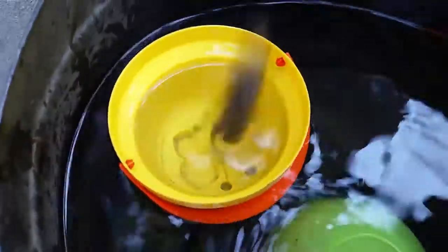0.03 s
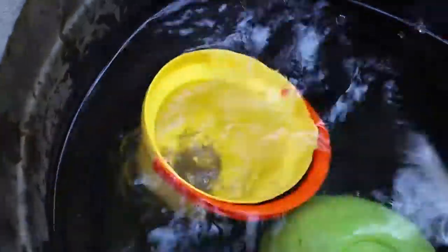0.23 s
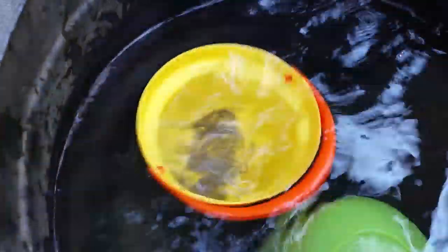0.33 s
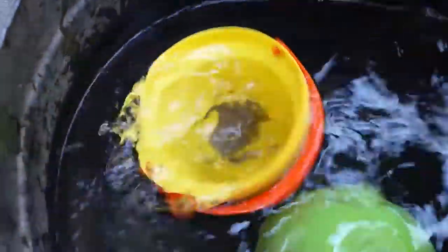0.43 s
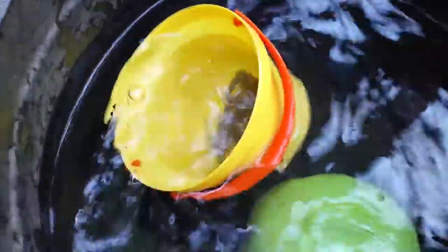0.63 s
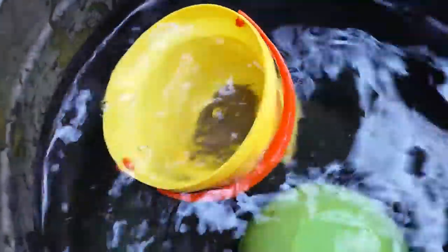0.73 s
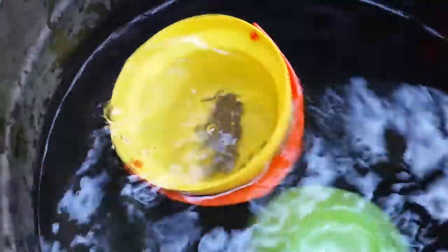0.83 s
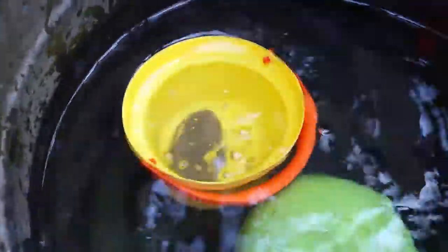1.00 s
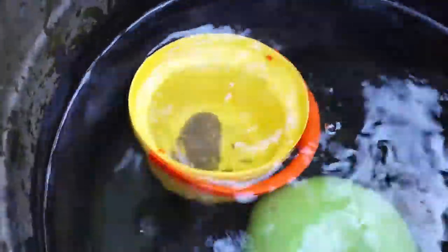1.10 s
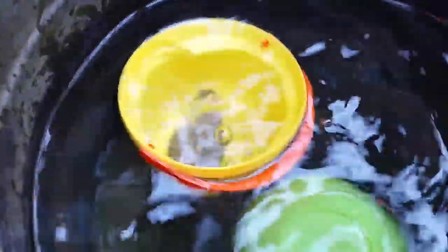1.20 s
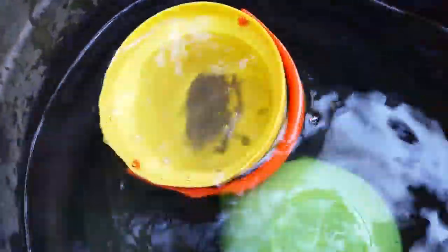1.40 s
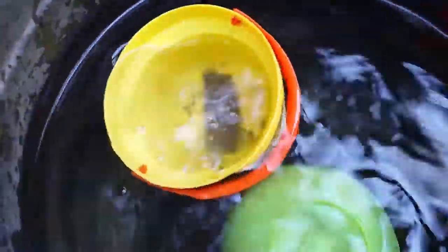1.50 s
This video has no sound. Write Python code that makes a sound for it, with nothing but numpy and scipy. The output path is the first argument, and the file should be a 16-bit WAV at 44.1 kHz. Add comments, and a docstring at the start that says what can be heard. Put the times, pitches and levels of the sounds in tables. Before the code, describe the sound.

A stone drops into a water-filled plastic bowl floating in a barrel, making one sharp, hollow plop close to the microphone. Bubbles gulp, a few drops fall back and the water quickly settles over a faint low hum.

```python
"""A stone smacks into a water-filled plastic bowl floating in a barrel, heard from close by.
The impact rings the bowl and one low note of the barrel; the air pocket behind the stone booms as
a cavity resonator, then closes with a rising bloop. Bubbles pip, the rocking bowl gulps, spray
falls back and the water sloshes to rest. A low hum and a thin hiss lie underneath."""
import sys
import numpy as np
from scipy import signal
from scipy.fft import rfft, irfft
from scipy.io import wavfile

SR = 44100
rng = np.random.default_rng(int(sys.argv[2]) if len(sys.argv) > 2 else 0)


def generate_wav(signal):
    """Clip the signal to [-1, 1] and save it as 16-bit WAV at the path in sys.argv[1]."""
    frames = np.transpose(np.atleast_2d(signal))
    scaled = np.clip(frames, -1, 1) * 32767
    pcm = np.round(scaled).astype(np.int16)
    wavfile.write(sys.argv[1], SR, pcm)


N = 68355
TIME = np.arange(N) / SR
FREQS = np.fft.rfftfreq(N, 1 / SR)

# the stone's blows on water and bowl [t/s, level/dB]
BLOWS = [(0.2197, -11.5), (0.236, -31), (0.253, -38)]
# spectrum of the smack [f/Hz, relative level/dB]
SMACK_SPECTRUM = [(150, -11.5), (450, 0.5), (850, -16.5), (1300, -11.5), (1650, -8), (2400, -1.5),
                  (2850, -11), (3400, -6.5), (4400, -4), (5400, -16), (6500, -23.5), (8700, -27),
                  (10800, -18)]
# balance of the smack [f/Hz, left minus right/dB]
SMACK_PAN = [(4000, -0.5), (10500, 5.5), (14000, 1)]
BLOW_RISE_S = 0.002
def smack():
    """Impact noise: each brief blow radiates a broadband burst with a weaker, longer tail."""
    power = np.zeros(N)
    for start, db in BLOWS:
        power += (amp(db) * burst(start, BLOW_RISE_S, t60=0.019)) ** 2
        power += (amp(db - 7.5) * burst(start, BLOW_RISE_S, t60=0.16)) ** 2
    lean_db = spectrum(SMACK_PAN) / 2
    return np.sqrt(power) * irfft(rfft(noise(SMACK_SPECTRUM)) * amp([lean_db, -lean_db]), N)


# ringing of the struck bowl, with one low note of the barrel [f/Hz, relative level/dB, T60/s]
RING_MODES = [(433, -7, 0.26), (1117, -7.5, 0.27), (1186, -6, .16), (1555, 0, 0.07), (1705, 0, 0.088),
              (2029, 0.5, 0.1), (2393, 3, 0.105), (2440, 9.5, 0.028), (2510, -4, 0.17), (3196, 4, 0.075),
              (3552, -4, 0.074), (3909, -6.5, 0.11)]
RING_DB, PHASE_SPREAD_RAD = -24.5, 1.33
def impact_ring():
    """Modal vibration: each blow rings the bowl and one low barrel note, in a different phase per ear."""
    first_s, first_db = BLOWS[0]
    ring = np.zeros((2, N))
    for start, db in BLOWS:
        for hz, mode_db, t60 in RING_MODES:
            phase = 2 * np.pi * hz * (TIME - first_s) + PHASE_SPREAD_RAD * rng.standard_normal((2, 1))
            ring += amp(db - first_db + mode_db) * burst(start, BLOW_RISE_S, t60) * np.sin(phase)
    return amp(RING_DB) * ring * pan(db=-2.5)


def bowl_throb(hz=138.5, db=-25.5):
    """Damped oscillation: a low throb swells and dies as the bowl is pushed under."""
    return amp(db) * burst(BLOWS[0][0], rise=0.058, t60=0.31) * np.sin(2 * np.pi * hz * TIME)


# resonance of the air behind the stone [t/s, f/Hz, level/dB]
POCKET_TRACK = [(0.2205, 224, -27), (0.226, 243, -18.5), (0.238, 197, -21.5), (0.246, 224.6, -13),
                (0.262, 204, -21), (0.274, 201, -22), (0.28, 210, -22.5), (0.295, 200, -30.5),
                (0.335, 204, -66)]
def air_pocket():
    """Cavity resonance: trapped air booms at a pitch set by its changing shape."""
    return gliding_tone(POCKET_TRACK, fade_s=0.002) * pan(db=3.0)


# resonance of the pocket's closing neck [t/s, f/Hz, level/dB]
NECK_TRACK = [(0.27, 282, -25), (0.292, 420.7, -31), (0.3, 580, -25), (0.316, 760, -46),
              (0.323, 900, -30.5), (0.33, 1050, -48), (0.343, 1207, -43.5), (0.356, 1280, -56)]
def bloop(echo_db=-11):
    """The resonance glides upward as the neck closes, blurred by reflections off the barrel wall."""
    tone = gliding_tone(NECK_TRACK, fade_s=0.0033)[None]
    echoes = unit(rng.standard_normal((2, N)) * burst(0, rise=0.001, t60=0.034)) / np.sqrt(N)
    return tone + amp(echo_db) * convolve(tone, echoes)


# bubbles, from small pips to gulps under the bowl's rim [t/s, f/Hz, level/dB, T60/s]
BUBBLES = [(0.056, 269, -42.5, 0.032), (0.2374, 1660, -12, 0.052), (0.2482, 950, -20.5, 0.029),
           (0.3196, 1840, -37, 0.05), (0.3805, 1015, -28, 0.057), (0.3823, 307, -8, 0.034),
           (0.389, 562, -24, 0.057), (0.4286, 340, -15.5, 0.023), (0.429, 1620, -35, 0.018),
           (0.4449, 433, -17, 0.036), (0.4455, 867, -33, 0.035), (0.446, 191, -21.5, 0.072),
           (0.502, 343, -31, 0.053), (0.504, 924, -38, 0.022), (0.508, 188, -35.5, 0.13),
           (0.5245, 1000, -40, 0.017), (0.5765, 324, -29.5, 0.014), (0.584, 198, -40.5, 0.096),
           (0.5952, 2114, -35.5, 0.044), (0.963, 947, -52.5, 0.014), (1.167, 740, -46.5, 0.0082)]
RISE_CYCLES, GLIDE_PER_T60, POP_DB = 0.83, 0.275, -18.5
def bubbles():
    """Bubble resonance: each forms with a soft pop and rings, its pitch rising as it nears the surface."""
    tones, pops = np.zeros(N), np.zeros(N)
    for start, hz, db, t60 in BUBBLES:
        age = np.maximum(TIME - start, 0)
        cycles = hz * (age + GLIDE_PER_T60 * age ** 2 / (2 * t60))
        tones -= amp(db) * burst(start, RISE_CYCLES / hz, t60) * np.sin(2 * np.pi * cycles)
        pops += amp(db + POP_DB) * burst(start, rise=0.001, t60=0.042)
    pop_noise = noise([(120, -26), (400, 2.5), (1600, -15.0), (7000, -48.5)])
    return tones * pan(db=1.5) + pops * pop_noise


# air modes of the barrel [f/Hz, gain at resonance/dB, T60/s]
BARREL_MODES = [(203, 1, 0.096), (306, -7.5, 0.14), (432.5, -2, 0.167), (573, -3, 0.082), (1115, -5, 0.081)]
def barrel(x, echo_db=-15, low_cut_hz=164):
    """Standing waves in the barrel ring on, its wall scatters echoes, and the deepest bass is lost."""
    modes = np.zeros(N)
    for hz, db, t60 in BARREL_MODES:
        damping = np.log(1000) / t60
        modes += amp(db) * 2 * damping / SR * np.exp(-damping * TIME) * np.cos(2 * np.pi * hz * TIME)
    echoes = noise([(150, -2.5), (600, 1)]) * burst(0, rise=0.003, t60=0.092)
    response = modes + amp(echo_db) * unit(echoes) / np.sqrt(N)
    return signal.lfilter(*signal.butter(2, low_cut_hz, "high", fs=SR), x + convolve(x, response))


# drops falling back [t/s, level/dB]
DROPS = [(0.176, -48), (0.2726, -25.5), (0.295, -44), (0.3481, -40), (0.374, -38.5), (0.438, -51),
         (0.4455, -38.5), (0.472, -37), (0.489, -45), (0.523, -50), (0.5904, -50.5), (0.622, -58)]
# spectrum of the spray [f/Hz, relative level/dB]
SPRAY_SPECTRUM = [(1500, -3.5), (3500, 3), (5500, -9.5), (7800, -27.5), (10000, -1), (12000, 4),
                  (14500, -6)]
DROP_T60_S, DROPLETS_PER_S, DROPLET_RE_SLOSH_DB = 0.038, 400, -13.5
def spray():
    """Incoherent sources add in power: drops land in bright spatters amid a patter of fine droplets."""
    drop_power = sum((amp(db) * burst(start, rise=0.004, t60=DROP_T60_S)) ** 2 for start, db in DROPS)
    falling = (TIME > BLOWS[0][0]) & (TIME < DROPS[-1][0])
    landings = falling * (rng.random(N) < DROPLETS_PER_S / SR)
    energies = landings * rng.exponential(1, N) * amp(curve(SLOSH_LEVEL) + DROPLET_RE_SLOSH_DB) ** 2
    patter_power = abs(signal.fftconvolve(energies, burst(0, rise=0.001, t60=DROP_T60_S) ** 2)[:N])
    spatter = unit(amp(2.5 * drift(N, hz=300)))  # lumpy gain of water breaking into drops
    return np.sqrt(drop_power + patter_power) * spatter * noise(SPRAY_SPECTRUM) * pan(db=5)


# envelope of the sloshing water [t/s, level/dB]
SLOSH_LEVEL = [(0.22, -52.5), (0.26, -30), (0.35, -50.5), (0.39, -45), (0.5, -48.5), (0.65, -60.5),
               (0.85, -69)]
# spectrum of the slosh [f/Hz, relative level/dB]
SLOSH_SPECTRUM = [(100, -19), (220, 11.5), (600, -0.5), (1300, -9), (3500, -16), (8000, -39)]
def slosh(splashes_per_s=3000, spread_db=4):
    """Shot noise: dense tiny splashes merge and die away as the water settles."""
    sizes = amp(spread_db * np.minimum(rng.exponential(1, (2, N)), 4))
    signs = rng.choice([-1, 1], (2, N))
    splashes = sizes * signs * (rng.random((2, N)) < splashes_per_s / SR)
    return colour(splashes, SLOSH_SPECTRUM) * amp(curve(SLOSH_LEVEL))


# envelopes of the background [t/s, hum level/dB, hiss level/dB]
BACKGROUND_LEVELS = [(0, -34.5, -49.5), (0.13, -36.5, -49), (0.37, -41.5, -58.5), (0.74, -46.5, -62.5),
                     (0.98, -51, -66.5), (1.28, -42, -58.5), (1.46, -37.5, -53)]
# tones of the hum [f/Hz, relative level/dB, modulation depth]
HUM_TONES = [(45, -4, 0.07), (92.6, -6.5, 0.5)]
# spectrum of the rumble [f/Hz, relative level/dB]
RUMBLE_SPECTRUM = [(20, -13), (50, 2), (115, 0), (180, -13), (300, -13.5), (420, -22.5), (800, -27.5),
                   (6000, -65)]
def hum(rumble_db=-7, drone_hz=292.2):
    """Randomly modulated tones over a rumble sink and come back; a higher drone sinks half as far."""
    level_db = curve(BACKGROUND_LEVELS)
    rumble = amp(rumble_db) * noise(RUMBLE_SPECTRUM)
    tones = sum(amp(db) * wavering(hz, depth) for hz, db, depth in HUM_TONES)
    drone = amp(level_db / 2 - 36) * wavering(drone_hz, depth=0.43)
    return ((rumble + tones) * amp(level_db) + drone) * pan(db=2.5)


# spectrum of the hiss [f/Hz, relative level/dB]
HISS_SPECTRUM = [(1400, -28), (2100, -15), (2850, -27), (3400, -5.5), (3950, 0), (4400, -9), (5000, -27),
                 (6300, -56)]
# envelope of the faint treble fizz [t/s, level/dB]
FIZZ_LEVEL = [(0.15, -73.5), (1.0, -85.5), (1.46, -77.5), (1.53, -56.5)]
def hiss():
    """Filtered noise: a thin band on the left and a brighter fizz fade and return."""
    band = unit(noise(HISS_SPECTRUM) * pan(db=19)) * amp(curve(BACKGROUND_LEVELS, axis=2))
    return band + noise(SPRAY_SPECTRUM) * amp(curve(FIZZ_LEVEL))


# likeness of the sound at the two ears [f/Hz, coherence]
COHERENCE = [(100, 0.99), (300, 0.79), (700, 0.61), (1400, 0.082)]
def colour(x, points):
    """Interaural coherence: two independent signals get one spectrum, with the bass alike in both."""
    left, other = rfft(x)
    coherence = np.clip(spectrum(COHERENCE), -1, 1)
    right = coherence * left + np.sqrt(1 - coherence ** 2) * other
    return unit(irfft(np.array([left, right]) * amp(spectrum(points)), N))


def noise(points):
    """Stereo Gaussian noise of rms 1, shaped by [f/Hz, relative level/dB] points."""
    return colour(rng.standard_normal((2, N)), points)


def drift(shape, hz):
    """Low-pass noise: a smooth random fluctuation of rms 1."""
    return unit(irfft(rfft(rng.standard_normal(shape)) * np.exp(-(FREQS / hz) ** 2), N))


def wavering(hz, depth):
    """Quadrature modulation: a tone drifts in level and phase."""
    in_phase, quadrature = drift((2, N), hz=7)
    carrier = np.exp(2j * np.pi * (hz * TIME + rng.random()))
    return unit(((1 + depth * (in_phase + 1j * quadrature)) * carrier).real)


def gliding_tone(track, fade_s):
    """Phase is the integral of frequency: a sine follows a [t/s, f/Hz, level/dB] track."""
    start, end = track[0][0], track[-1][0]
    gate = np.clip(np.minimum(TIME - start, end - TIME) / fade_s, 0, 1)
    cycles = np.cumsum(curve(track) * (TIME > start)) / SR
    return gate * amp(curve(track, axis=2)) * np.sin(2 * np.pi * cycles)


def burst(start, rise, t60):
    """A smooth rise and an exponential decay of 60 dB in t60; times in seconds."""
    age = np.maximum(TIME - start, 0)
    return np.sin(np.pi / 2 * np.minimum(age / rise, 1)) ** 2 * np.exp(-np.log(1000) * age / t60)


def convolve(x, response):
    """Convolution with an impulse response, cut to the scene's length."""
    return signal.fftconvolve(x, response, axes=1)[:, :N]


def spectrum(points):
    """Interpolation over log frequency."""
    hz, values = np.array(points).T
    return np.interp(np.log(FREQS + 1), np.log(hz), values)


def curve(points, axis=1):
    """Interpolation of one column over time."""
    columns = np.array(points).T
    return np.interp(TIME, columns[0], columns[axis])


def pan(db):
    """Interaural level difference, left minus right, as two gains."""
    return amp([[db / 2], [-db / 2]])


def amp(db):
    """Decibels to amplitude ratio."""
    return 10 ** (np.asarray(db) / 20)


def unit(x):
    """Normalisation to rms 1."""
    return x / np.sqrt(np.mean(abs(x) ** 2) + 1e-20)


def scene(right_lag_s=8 / SR):
    """Superposition of the sources; all but the impact and the spray reach the left ear first."""
    left, right = air_pocket() + bloop() + barrel(bubbles()) + slosh() + hum() + hiss()
    late_right = np.interp(TIME - right_lag_s, TIME, right)
    impact = impact_ring() + smack() + bowl_throb()
    return impact + np.array([left, late_right]) + spray()


def record(dry, cutoff_hz=14800):
    """Band limiting: a steep low-pass filter removes the highest treble."""
    low_pass = signal.firwin(201, cutoff_hz, window=("kaiser", 8), fs=SR)
    return signal.oaconvolve(dry, low_pass[None], "same")


dry = scene()
out = record(dry)
generate_wav(out)
```